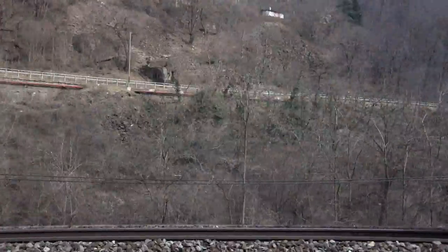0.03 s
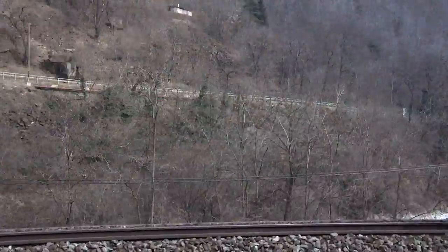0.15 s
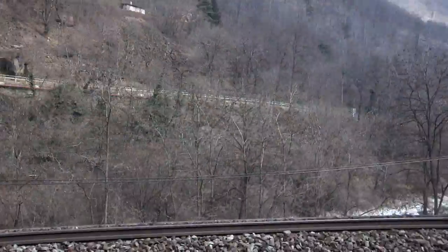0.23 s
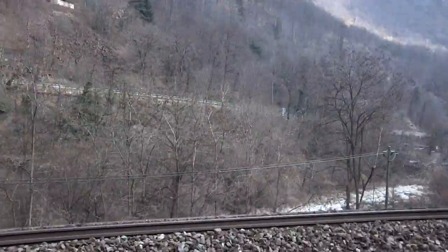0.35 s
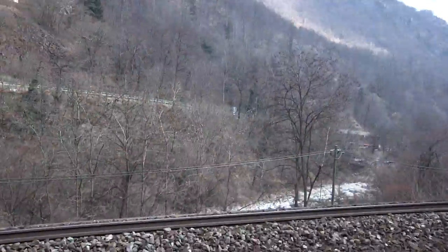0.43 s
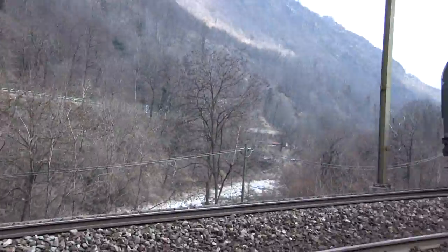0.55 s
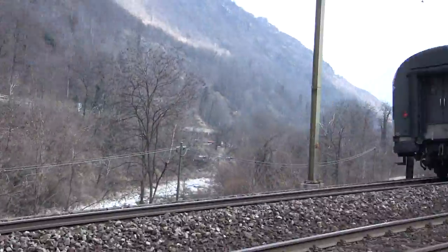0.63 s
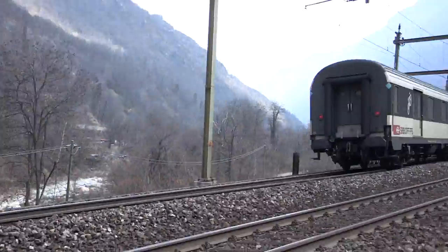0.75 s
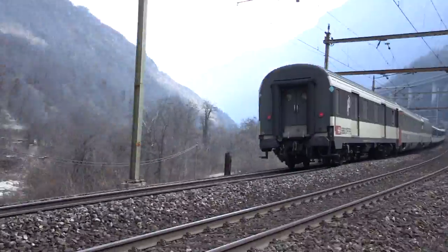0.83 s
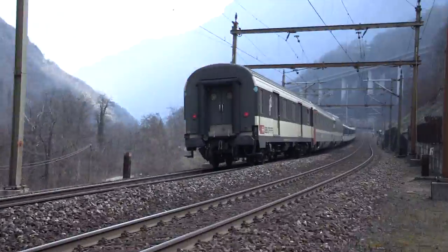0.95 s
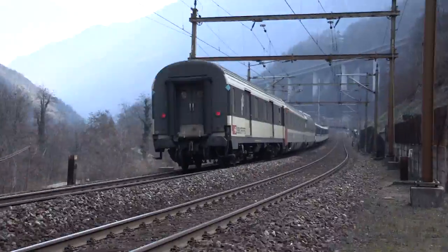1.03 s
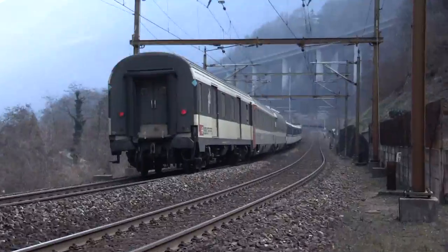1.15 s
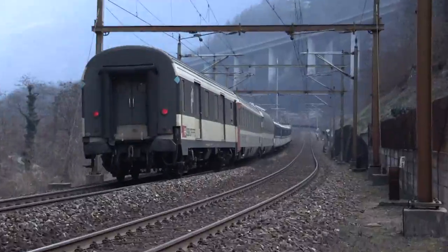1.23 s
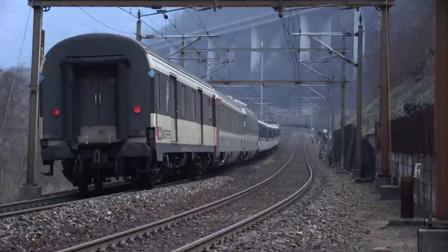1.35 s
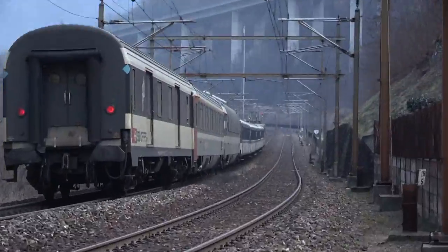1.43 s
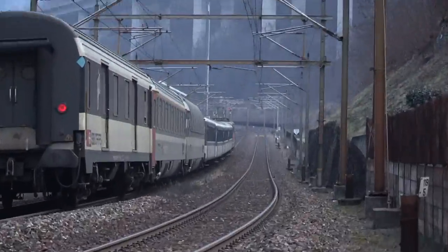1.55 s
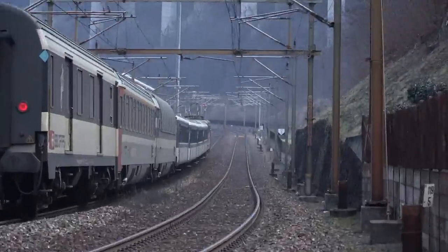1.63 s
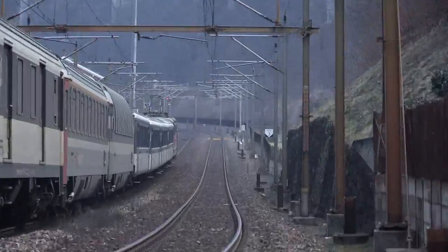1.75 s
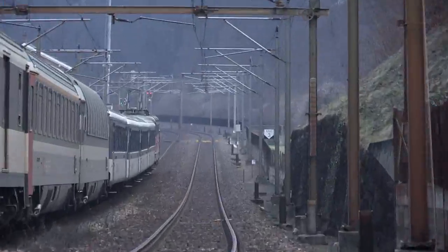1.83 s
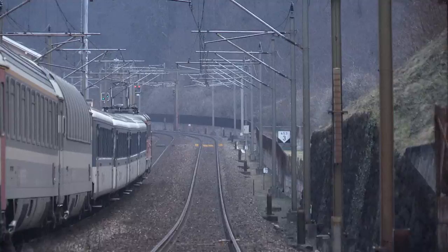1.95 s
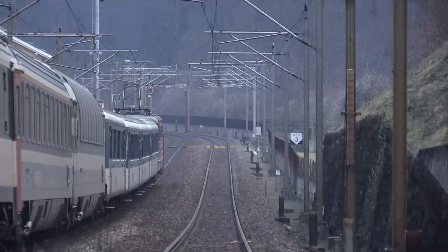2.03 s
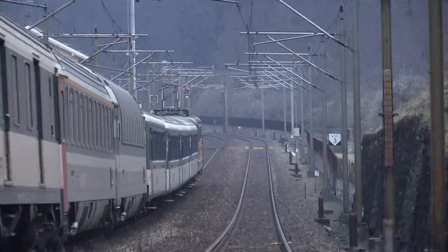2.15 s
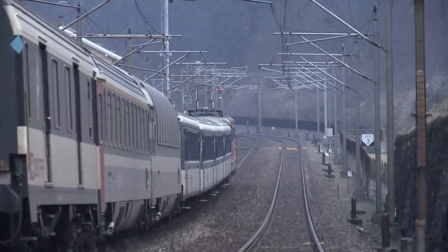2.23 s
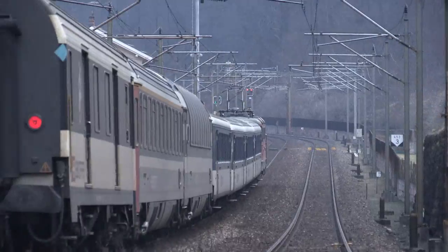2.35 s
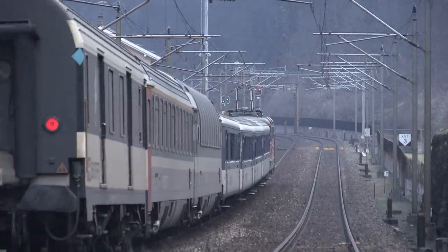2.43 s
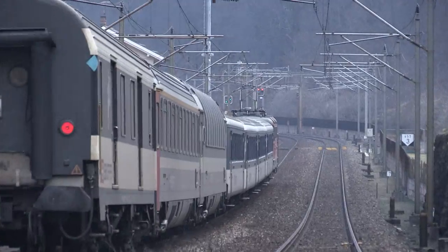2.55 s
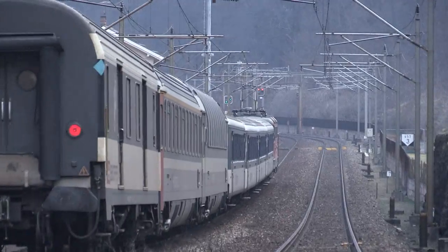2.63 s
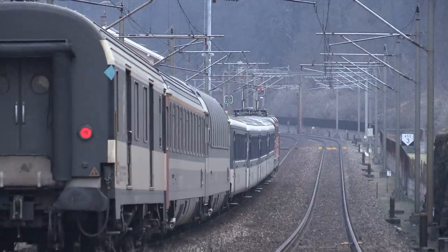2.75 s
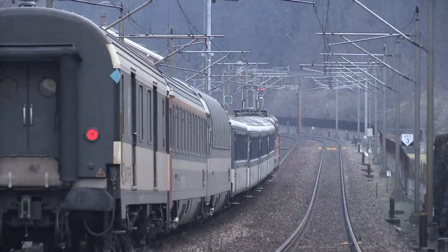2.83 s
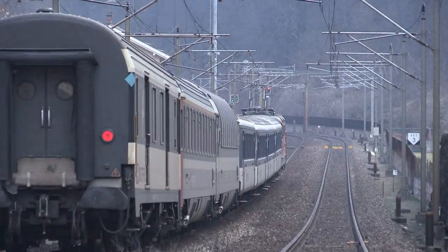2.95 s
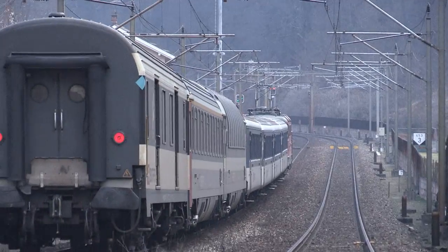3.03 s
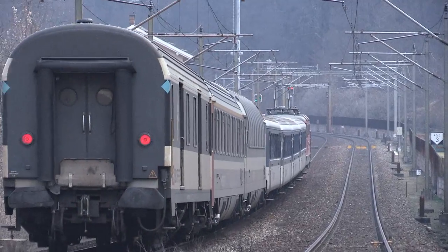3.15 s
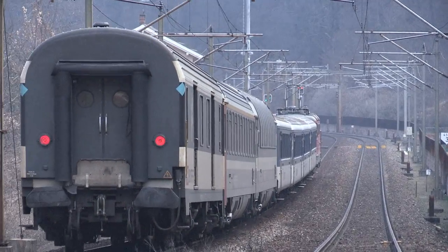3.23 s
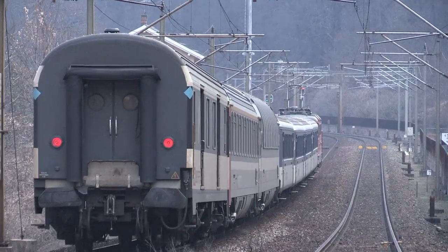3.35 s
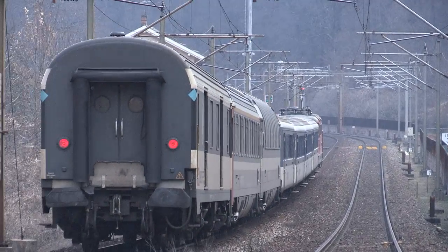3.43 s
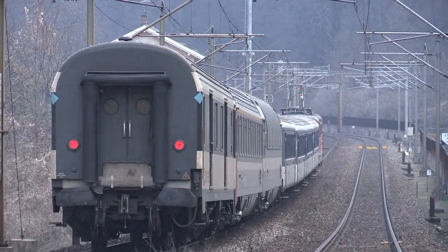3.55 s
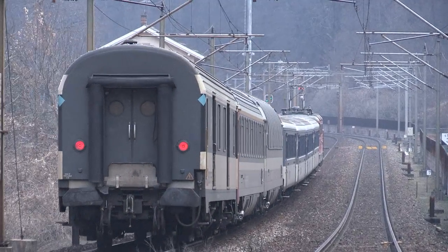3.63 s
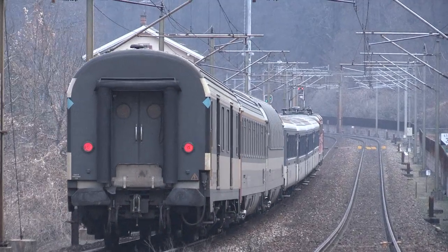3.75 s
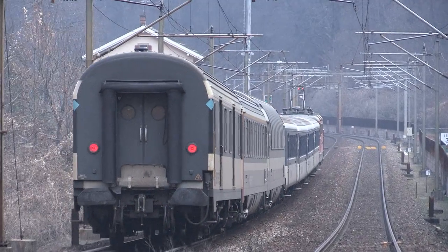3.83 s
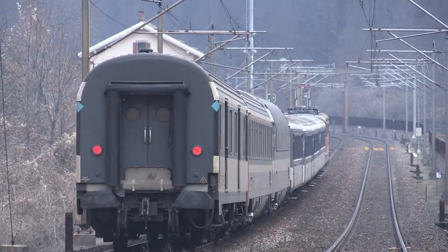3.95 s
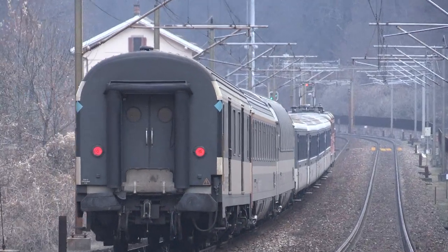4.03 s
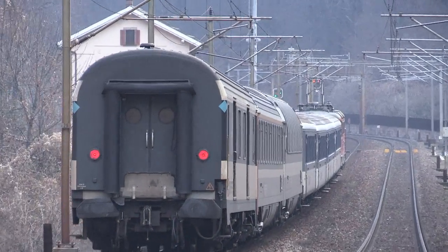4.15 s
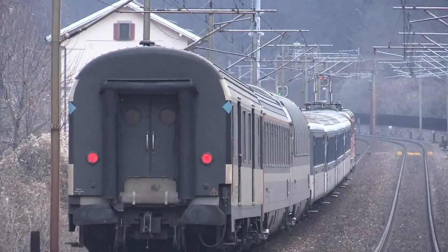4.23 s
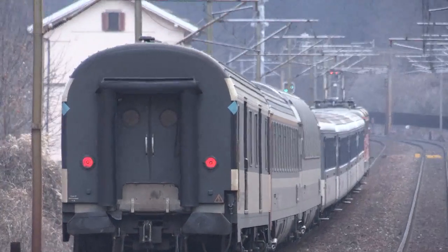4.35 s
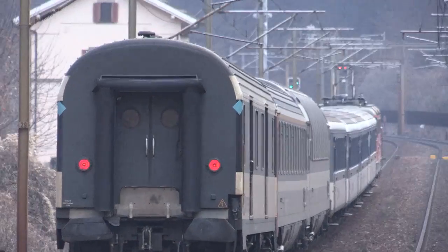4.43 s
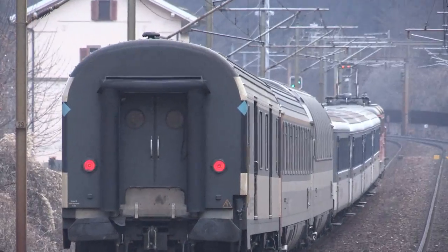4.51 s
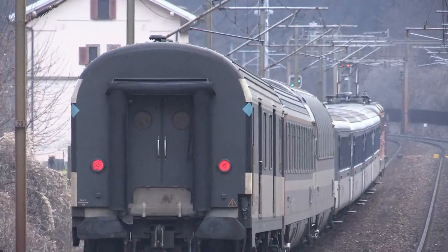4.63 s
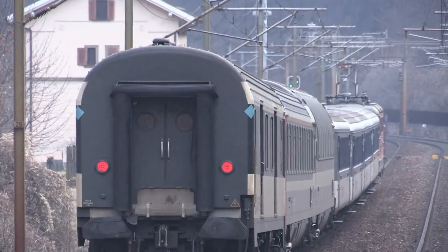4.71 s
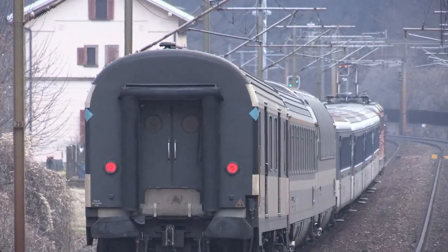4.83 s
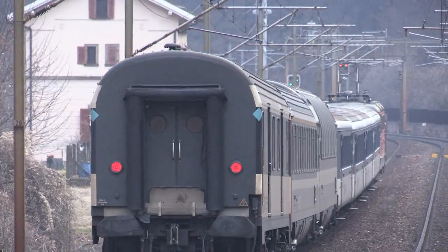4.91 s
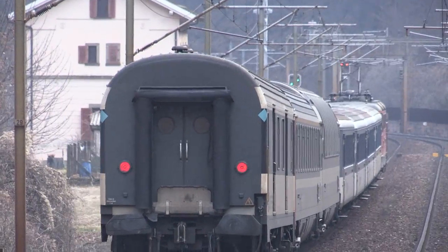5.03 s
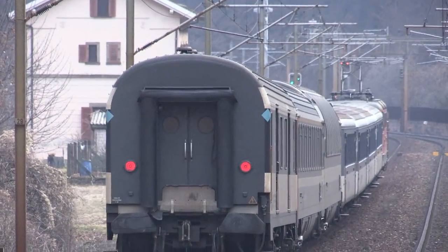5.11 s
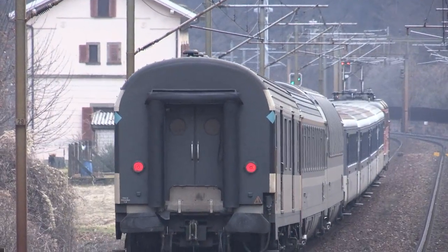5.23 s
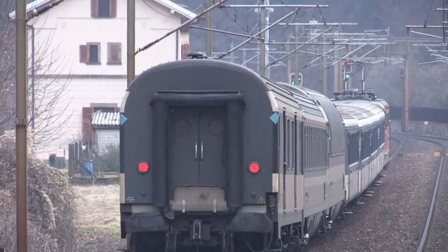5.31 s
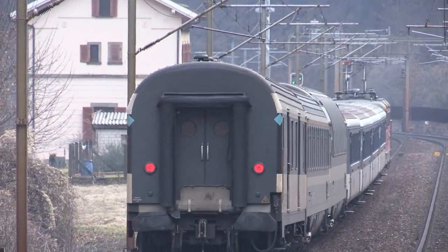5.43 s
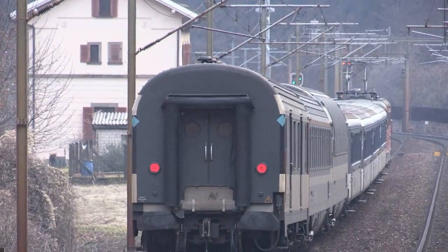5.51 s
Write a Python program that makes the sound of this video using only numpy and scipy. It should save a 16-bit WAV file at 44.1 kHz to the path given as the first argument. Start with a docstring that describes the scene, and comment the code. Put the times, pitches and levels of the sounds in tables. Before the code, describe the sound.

A stereo microphone near the track catches the tail of a train: uneven wheel knocks over a dense rolling roar, loudest at the start and falling quickly. As the train goes round the bend, the faint distant roar remains beneath short, wavering wheel squeals and rough flange grinding. Late on, low wind noise brushes the microphone, then a small scratchy click sounds close by.

```python
"""A knocking, rolling roar fades as the last coach of an electric train runs away round a curve.
The bend hides its last bogie (the wheel frame), leaving the far train: shaped noise with rings in the track.
Flanges (wheel rims) bear on the outer rail in fits: narrow noise grinds and rings, wavering tones squeal.
Late on, a lumpy noise gust rushes over the microphones and a small double click sounds close by.
Under it all lie a low outdoor rumble and a thin hiss that rises at the end."""
import sys
import numpy as np
from scipy import signal
from scipy.fft import rfft, irfft, next_fast_len
from scipy.io import wavfile
from scipy.ndimage import uniform_filter1d, minimum_filter1d, map_coordinates

SR = 44100
rng = np.random.default_rng(int(sys.argv[2]) if len(sys.argv) > 2 else 0)


def transcribe(signal):
    """Save signal, clipped to [-1, 1], as a 16-bit WAV file at the path in sys.argv[1]."""
    frames = np.atleast_2d(signal).T
    limited = np.clip(frames, -1, 1)
    pcm = np.round(limited * 32767).astype(np.int16)
    wavfile.write(sys.argv[1], SR, pcm)


N = 246078

# worn treads (the rolling faces of the wheels) knock on the rail: (time [s], strength [dB])
KNOCKS = [(.032, 1), (.075, 1), (.125, 7), (.16, 0), (.214, 6.5), (.297, 6), (.351, 4), (.419, 5.5),
          (.447, 2.5), (0.477, 4.5), (.528, 3), (0.569, 5.5), (.67, 3), (0.704, 6.5), (.735, 1.5),
          (.80, 1.5), (.849, 2), (0.908, 4), (.96, 2), (1.016, 3.5), (1.13, 1.5), (1.249, 3.5),
          (1.294, 4.5), (1.377, 1.5), (1.427, 1), (1.518, 2), (1.835, 0.5), (2.11, 0), (2.255, 4)]
# rolling roar of the last bogie: (level abreast [dB], loss per tenfold distance [dB])
ROAR_FADE = (-12.5, 39.06)


def amp(db):
    """Turn decibels into gain."""
    return 10 ** (np.asarray(db) / 20)


def unit(x):
    """Scale to an average (rms) level of 1."""
    return x / np.sqrt(np.mean(x ** 2) + 1e-20)


def along(points, hz):
    """Read a curve of (frequency [Hz], value) points on a log frequency axis."""
    f, v = np.transpose(points)
    return np.interp(np.log(hz + 1), np.log(f + 1), v)


def curves(rows):
    """Give one value per sample for each column after the time."""
    s, *cols = np.transpose(rows)
    t = np.arange(N) / SR
    return [np.interp(t, s, c) for c in cols]


def wobble(rate):
    """Draw a smooth random curve with this many random knots a second."""
    coarse = np.arange(0, N + 16, 16)
    knots = rng.standard_normal(int(N * rate / SR) + 4)
    bends = map_coordinates(knots, [coarse * rate / SR])
    return np.interp(np.arange(N), coarse, bends)


def filtered(x, response):
    """Multiply the spectrum of x by a response that depends on frequency."""
    m = next_fast_len(N + 8192)
    hz = np.fft.rfftfreq(m, 1 / SR)
    return irfft(rfft(x, m) * response(hz), m)[..., :N]


def rush(spectrum, alike, patchy_db):
    """Make stereo noise of rms 1 with patches of random gain; alike is the left-right likeness."""
    z = signal.stft(rng.standard_normal((2, N)), nperseg=1024)[2]
    field = uniform_filter1d(rng.standard_normal(z.shape[1:]), size=3, axis=0)
    field = uniform_filter1d(field, size=10, axis=1)
    pair = signal.istft(z * amp(patchy_db * unit(field)), nperseg=1024)[1][:, :N]

    def response(hz):
        turn = np.arccos(np.clip(along(alike, hz), -1, 1)) / 2
        return amp(along(spectrum, hz)) * [np.cos(turn), np.sin(turn)]

    mid, side = filtered(pair, response)
    return unit(np.array([mid + side, mid - side]))


def ringing(hz, width_hz, spread):
    """Rub a resonance at random: stereo narrow noise round a fixed or moving pitch."""
    coarse = np.arange(0, N + 16, 16)
    damping = signal.butter(2, width_hz / 2, fs=SR / coarse[1], output="sos")
    swing = signal.sosfilt(damping, rng.standard_normal((2, 2, len(coarse))))
    phase = 2 * np.pi * np.cumsum(hz * np.ones(N)) / SR
    cos, sin, n = np.cos(phase), np.sin(phase), np.arange(N)
    mid, side = [np.interp(n, coarse, a) * cos + np.interp(n, coarse, b) * sin for a, b in swing]
    return unit(np.array([mid + spread * side, mid - spread * side]))


def placed(x, lean_db):
    """Pan the treble with the train; bass bends round the listening point and stays a little left."""
    # where the train is heard: (time [s], left-right level difference before the lean [dB])
    bearing = [(0, -6.5), (.4, -6.5), (1.1, -1), (1.8, -0.6), (3, -0.6), (5.58, -1)]
    pan = lambda db: amp(np.array([db, -db]) / 2)
    # (frequency [Hz], share that bends round)
    bass = filtered(x, lambda hz: np.clip(along([(230, 1), (1200, 0.033)], hz), 0, 1))
    return bass * pan(np.full(N, 2.7)) + (x - bass) * pan(curves(bearing)[0] + lean_db)


def distance():
    """Follow the last bogie from abreast, straight along the track, in multiples of the track's distance."""
    speed_m_per_s, track_m = 21.05, 13.97
    return np.hypot(1, speed_m_per_s * np.arange(N) / SR / track_m)


def receding(fade):
    """Give the gain of a sound that weakens as the last bogie gets farther away."""
    abreast_db, loss_db = fade
    return amp(abreast_db - loss_db * np.log10(distance()))


def behind_bend():
    """Tell how far the bend hides the last bogie, from 0 to 1."""
    hide_s, hide_takes_s = 2.71, 0.41
    return np.clip((np.arange(N) / SR - hide_s) / hide_takes_s, 0, 1)


def widened(x):
    """Widen the stereo image close by, where the train fills a wide angle; narrow it as the train leaves."""
    close_width = 1  # extra side gain abreast
    side = (x - x[::-1]) / 2
    return x + close_width / distance() ** 2 * side


def track_changes():
    """Raise or lower the thrum and the roar, in dB, for a moment as the track changes under the wheels."""
    # (time at the middle [s], thrum change [dB], roar change [dB])
    track_spots = [(0.03, 8, 1.5), (0.33, 6, 1), (0.55, -1, 1.4), (0.71, 4, 2), (1.55, 1, 0.3),
                   (2.04, 0, 1.5), (2.65, -2, -0.7)]
    spot_s = 0.1
    t = np.arange(N) / SR
    return sum(np.outer(changes, np.exp(-((t - s) / spot_s) ** 2)) for s, *changes in track_spots)


def judder(depth_db, rattle_db):
    """Oval treads throb twice a wheel turn, bogies rattle at random, and knocks bunch the roar into bursts."""
    throb_hz, knock_s = 14, 0.012  # the throb rate wanders round this
    t = np.arange(N) / SR
    phase = 2 * np.pi * np.cumsum(throb_hz * (1 + 0.12 * wobble(5.36))) / SR
    knock = amp(sum(db * np.exp(-((t - s) / knock_s) ** 2) for s, db in KNOCKS))
    # divide by the local average, so that knocks gather the sound instead of adding to it
    burst = knock / np.sqrt(uniform_filter1d(knock ** 2, size=SR // 4))
    return burst * amp(depth_db * np.sin(phase) + rattle_db * wobble(90))


def rolling(flange_hiss):
    """Rough wheels shake sleepers and rails; with distance the track's own resonances drop away."""
    # noise colours of the low thrum, roar, hiss and high fizz: (frequency [Hz], relative level [dB per Hz])
    thrum_spectrum, fizz_spectrum = [(25, -44), (45, -52), (100, -18.5), (150, -11), (192, 1.5), (240, -7),
                                     (300, -10), (450, -45), (900, -90)], [(1000, -70), (4000, -5), (7000, 3), (8300, 0.5),
                                                    (9600, 3.5), (11000, -1.5), (13500, -4), (15000, 2)]
    roar_near, roar_far = [(60, -90), (180, -46), (300, -26.5), (355, -2.5), (400, -5), (445, 0.5),
                           (500, 1), (620, -8), (800, -5), (880, -5), (960, -4), (1150, -16.5), (1600, -38),
                           (2100, -46), (6000, -62)], [(30, -60), (150, -19.5), (310, -7), (470, -9), (600, -3.5),
                                              (770, 2), (950, -3), (1150, -4), (1600, -5.5), (2100, -11),
                                              (6000, -54.5)]
    hiss_near, hiss_far = [(200, -70), (900, -57), (1500, -4), (1900, 0), (2500, 1.5), (2780, -4),
                           (3400, -6), (4300, -11.5), (5100, -9), (6000, -17.5), (7500, -26.5),
                           (12000, -45)], [(200, -70), (900, -16), (1600, 0), (2200, -7.5), (2600, 1.5),
                                              (3100, 2), (3800, -4), (4400, -6.5), (5100, -9.5),
                                              (6000, -17.5), (7000, -22.5), (8200, -34), (10000, -39)]
    # stereo likeness of the roar: (frequency [Hz], left-right likeness [-1 to 1])
    roar_alike = [(60, 1), (300, 0.99), (550, 0.93), (900, 0.86), (1400, 0.72), (3000, 0.69)]
    # roar from the rest of the train: (time [s], level before the common gain [dB])
    distant_roar = [(3.2, -45.5), (3.5, -47.5), (4.11, -43.5), (4.5, -46.5), (5.39, -43.5), (5.58, -45)]
    distant_gain_db = 2.5
    # (level abreast [dB], loss per tenfold distance [dB])
    thrum_fade, hiss_fade, fizz_fade = (-34, 25.2), (-31, 26.1), (-39, 61)
    hide_thrum_db, hide_roar_db, hide_hiss_db = 12, 10.5, 3  # losses behind the bend
    diffuse_share = 0.2  # share of far-sounding noise even close by
    hiss_share = 0.55  # share of the roar's track changes and judder that reaches the hiss

    hidden = behind_bend()
    thrum_change_db, roar_change_db = track_changes()
    near_gain = receding(ROAR_FADE) * amp(roar_change_db - hide_roar_db * hidden)
    distant_gain = amp(curves(distant_roar)[0] + distant_gain_db)
    roar_gain = np.hypot(near_gain, distant_gain)
    wheel_hiss = receding(hiss_fade) * amp(hiss_share * roar_change_db - hide_hiss_db * hidden)
    hiss_gain = np.hypot(wheel_hiss, flange_hiss)

    far = np.clip(diffuse_share + 0.8 * (distant_gain / roar_gain) ** 2, 0, 1)
    blend = lambda near, distant: np.sqrt(1 - far) * near + np.sqrt(far) * distant
    shake = judder(depth_db=0.5, rattle_db=-0.16)

    thrum_gain = receding(thrum_fade) * amp(thrum_change_db - hide_thrum_db * hidden)
    thrum = thrum_gain * rush(thrum_spectrum, [(60, 1.0), (200, 0.96)], patchy_db=1)
    close_roar = shake * rush(roar_near, roar_alike, patchy_db=1.5)
    roar = roar_gain * blend(close_roar, rush(roar_far, roar_alike, patchy_db=2))

    near_alike = [(1400, 0.91), (2400, 0.94), (4200, 0.62), (7000, 1.0)]
    close_hiss = amp(1.0) * shake ** hiss_share * rush(hiss_near, near_alike, patchy_db=2.0)
    far_hiss = amp(3.5) * rush(hiss_far, [(1000, 1.0), (4000, 0.88)], patchy_db=1.5)
    hiss = hiss_gain * blend(close_hiss, far_hiss)
    fizz = receding(fizz_fade) * rush(fizz_spectrum, [(7000, 0.78), (14000, 0.36)], patchy_db=3.5)

    # the rail bounces on its pads
    bounce_gain = amp(-5.5) * roar_gain * (1 - far) ** 2 / distance()
    bounce = bounce_gain * ringing(444, width_hz=15.0, spread=.1)
    # the rail flexes between sleepers: (time [s], level relative to the roar [dB])
    span_db, = curves([(0, -39), (.9, -5), (1.4, -7.5), (1.9, -7.5), (2.7, -17), (3, -28)])
    flex = 0.75 * ringing(1055, width_hz=310, spread=0.71)
    flex += 0.49 * ringing(958, width_hz=29, spread=0.3)
    flex += 0.36 * ringing(1055, width_hz=32, spread=0.3)
    span = amp(span_db) * roar_gain * flex
    # the sleepers bend
    sleepers = amp(span_db - 6.5) * near_gain * ringing(760, width_hz=220, spread=0.28)

    main = thrum + roar + shake * (bounce + sleepers) + widened(hiss) + fizz
    return placed(main, lean_db=1.85) + placed(shake * span, lean_db=10.5)


def thumps():
    """Each tread knock rings the track for a moment, a little differently every time."""
    # ringing of rail and sleepers: (centre frequency [Hz], middle level [dB], time to fall 60 dB [s])
    track_modes = [(364, -1.5, 0.082), (453, 4.5, 0.07), (509, 3, 0.03), (686, -6, 0.025),
                   (794, -7.5, 0.037), (955, -2, 0.044), (1050, -12, 0.036), (1500, 0, 0.02)]
    thump_db, attack_s, low_cut_hz = -7, 0.00303, 270
    t, out = np.arange(SR // 8) / SR, np.zeros(N + SR)
    hz, mode_db, t60 = np.transpose(track_modes)[:, :, None]
    for s, db in KNOCKS:
        detune, scatter, turn = rng.standard_normal((3, len(hz), 1))
        tone = np.sin(2 * np.pi * (hz * (1 + 0.016 * detune) * t + turn))
        ring = amp(mode_db + 2.7 * scatter - 60 * t / t60) * tone
        start = max(round((s - 2 * attack_s) * SR), 0)
        out[start:start + len(t)] += amp(db + thump_db) * (1 - np.exp(-t / attack_s)) * ring.sum(axis=0)
    # a slim rail radiates little bass
    radiated = filtered(out[:N], lambda hz: 1 - 1 / (1 + (hz / low_cut_hz) ** 4))
    return placed(receding(ROAR_FADE) * radiated, lean_db=-1.0)


def rail_whine():
    """The rail sings thinly while the wheels are still near."""
    # rail resonances: (frequency [Hz], width [Hz], relative level [dB])
    rail_modes = [(2406, 64, -1), (2930, 60, -9)]
    rail_fade = (-34.5, 57)  # (level abreast [dB], loss per tenfold distance [dB])
    whine = sum(amp(db) * ringing(hz, width, spread=0.25) for hz, width, db in rail_modes)
    return placed(receding(rail_fade) * whine, lean_db=4.0)


def bogie_ring():
    """The last bogie rings thinly, as narrow noise, until the bend hides it."""
    bogie_hz, bogie_fade = 1812, (-34, 37)  # fade: (level abreast [dB], loss per tenfold distance [dB])
    ring = ringing(bogie_hz, width_hz=32, spread=0.25)
    return placed(receding(bogie_fade) * (1 - behind_bend()) * ring, lean_db=2.0)


def bites():
    """Give gains of grinding, ringing and hiss: each flange contact builds up, holds and lets go."""
    # flange contacts: (start [s], length [s], grinding [dB], ringing [dB], hiss [dB])
    contacts = [(0.84, 0.55, -37.5, -70, -45), (1.507, 0.52, -45, -50.5, -55),
                (2.47, 0.16, -62, -51.5, -67), (3.08, 0.42, -53.5, -58, -53),
                (3.59, 0.32, -49.5, -54.5, -53), (3.883, 0.29, -43.5, -52.5, -50),
                (4.163, 0.23, -47, -52, -55.5), (4.485, 0.24, -41, -51, -58.5),
                (4.81, 0.3, -44.5, -51.5, -58), (5.31, 0.11, -66, -57, -75)]
    attack_s, release_s = 0.037, 0.21
    t, power = np.arange(N) / SR, np.zeros((3, N))
    for s, length, *levels in contacts:
        attack = np.clip((t - s) / attack_s, 0, 1)
        release = np.exp(-np.clip((t - s - length) / release_s, 0, 20))
        power += np.outer(amp(levels), attack * release) ** 2
    return np.sqrt(power)


def wheels(flange_grind, flange_ring):
    """Sideways creep in the curve rings each wheel mode in fits, while the flange grinds in pulses."""
    # wheel resonances: (centre frequency [Hz], width [Hz], level before air loss [dB])
    wheel_modes = [(1785, 26, -6), (2353, 20.6, -3), (2397, 26, -1.5), (2396, 170, -2.5), (2444, 25, -2.5),
                   (2556, 160, -4.5), (2820, 18, -9), (2850, 17, -12.5), (2920, 23, -8.5),
                   (3120, 27, -14.5), (3392, 29, -11), (3445, 30, -13.5), (3750, 24, -14), (3900, 54, -16),
                   (3960, 24, -16), (4060, 20, -18), (4460, 22, -21), (4620, 22, -16.5), (4700, 20, -18.5),
                   (4878, 30, -17), (5310, 18, -18.5), (5390, 18, -19), (5830, 20, -36), (6040, 18, -26),
                   (6100, 14, -24.5), (6865, 18, -36), (6940, 18, -32)]
    # the grinding's pitch sinks deep in the curve and recovers as the flange lets go: (time [s], pitch [Hz])
    grind_pitch = [(3.0, 1400), (3.7, 1425), (4.0, 1385), (4.45, 1320), (4.65, 1270), (5.02, 1275),
                   (5.15, 1210), (5.3, 1380)]
    # narrow tones inside the grinding: (multiple of its pitch, relative level [dB])
    grind_tones = [(1.03, -6.5), (0.972, -6)]
    # steady part: (level abreast [dB], loss per tenfold distance [dB])
    ring_fade, grind_fade = (-40.5, 24.4), (-35.5, 23.3)
    air_loss_db, air_loss_at_hz = 0.8, 6000  # loss at this frequency per multiple of the track distance
    flutter_hz, flutter_db = 28.1, 1.7  # random pulses: knots per second and depth

    # air takes the top off the ringing, reckoned from the average distance
    beyond = distance() - distance().mean()
    modes = np.zeros((2, N))
    for hz, width, db in wheel_modes:
        air = amp(-air_loss_db * (hz / air_loss_at_hz) ** 2 * beyond)
        fit = unit(amp(2.6 * wobble(13)))
        pitch = hz * (1 + 0.000994 * wobble(9))
        modes += amp(db) * air * fit * ringing(pitch, width, spread=0.15)

    grind_hz, = curves(grind_pitch)
    tones = sum(amp(db) * ringing(ratio * grind_hz, width_hz=38, spread=0.2) for ratio, db in grind_tones)
    band = 0.64 * ringing(grind_hz, width_hz=250, spread=0.25)
    grind = (tones + band) * unit(amp(flutter_db * wobble(flutter_hz)))
    ring_gain = np.hypot(receding(ring_fade), flange_ring)
    grind_gain = np.hypot(receding(grind_fade), flange_grind)
    return placed(ring_gain * modes + grind_gain * grind, lean_db=2.0)


def background():
    """A low outdoor rumble, and a thin hiss that flickers, slowly sinks and rises at the end."""
    # noise colours of the hiss and of the valley's rumble: (frequency [Hz], relative level [dB per Hz])
    air_spectrum, valley_spectrum = [(5000, -14), (9000, -6), (11000, 2.5), (13500, 4), (14300, 4),
                                     (14900, -25)], [(20, -20), (50, -3), (100, -2), (200, -6.5), (600, -35),
                                                  (2000, -70)]
    air_db, sink_db_per_s = -65, 2
    rise_s, rise_takes_s, rise_db = 5.31, 0.15, 8.5
    t = np.arange(N) / SR
    level_db = air_db - sink_db_per_s * t + rise_db * np.clip((t - rise_s) / rise_takes_s, 0, 1)
    hiss = amp(level_db + 1.0 * wobble(14)) * rush(air_spectrum, [(10000, .3)], patchy_db=4.5)
    rumble = amp(-69.0) * rush(valley_spectrum, [(60, 0.97)], patchy_db=-2.5)
    return placed(hiss + rumble, lean_db=4.5)


def squeals():
    """Now and then stick-slip locks on one mode, which swells into a rough, wavering tone and lets go."""
    # squeals of single wheels: (middle [s], length [s], centre pitch [Hz], level before gain and scatter [dB])
    squeal_rows = [(2.40, .12, 4888, -51), (2.56, .14, 2347, -44), (2.67, .10, 3402, -55),
                   (2.90, .11, 4091, -50), (3.11, .14, 2890, -48), (3.15, .22, 5315, -57),
                   (3.28, .08, 6780, -67), (3.37, .12, 4080, -56), (3.412, .085, 6065, -57),
                   (3.65, .10, 2452, -49), (3.70, .09, 5318, -60), (3.795, .10, 2922, -43),
                   (3.99, .19, 2385, -43), (4.02, .11, 5404, -54.5), (4.03, .09, 3466, -50),
                   (4.05, .10, 4521, -53), (4.07, .09, 4866, -54.5), (4.10, .09, 2928, -45),
                   (4.12, .09, 5297, -58), (4.16, .10, 2845, -44.5), (4.17, .08, 3402, -49.5),
                   (4.18, .10, 2392, -43), (4.22, .10, 6180, -65), (4.31, .22, 2436, -42),
                   (4.40, .10, 6062, -56), (4.40, .09, 3143, -51), (4.43, .10, 5318, -57.5),
                   (4.53, .13, 2366, -36), (4.60, .12, 4888, -56), (4.62, .10, 2462, -44),
                   (4.65, .18, 2392, -39.5), (4.64, .09, 6180, -64), (4.68, .19, 6055, -59),
                   (4.72, .08, 2445, -44), (4.855, .09, 2380, -40), (4.96, .09, 2415, -45),
                   (4.97, .17, 4900, -58), (5.02, .09, 2490, -47), (5.08, .14, 2885, -51),
                   (5.12, .12, 2452, -42), (5.16, .16, 5404, -64), (5.43, .08, 2450, -45)]
    squeal_gain_db = -1
    t, out = np.arange(N) / SR, np.zeros((2, N))
    waver = .0027 * wobble(130)
    chatter = amp(1.8 * wobble(90))
    for s, length, hz, db in squeal_rows:
        on = np.abs(t - s) < length / 2
        swell = np.cos(np.pi * (t[on] - s) / length) * chatter[on]
        tone = np.sin(2 * np.pi * np.cumsum(hz * (1 + waver[on])) / SR)
        scatter_db = rng.normal(0, 1, (2, 1))  # each ear gets its own level
        out[:, on] += amp(db + squeal_gain_db + scatter_db) * swell * tone
    return placed(out, lean_db=2.5)


def flange_whine():
    """A thin, unsteady overtone of the flange grinding sinks to a steady note."""
    # (time [s], pitch [Hz], level [dB])
    whine_path = [(4.2, 4130, -75), (4.3, 4075, -55), (4.45, 3870, -63), (4.57, 3830, -53),
                  (4.75, 3770, -63), (5.05, 3760, -59.5), (5.28, 3746, -63), (5.4, 3746, -80)]
    hz, db = curves(whine_path)
    started = np.arange(N) / SR > whine_path[0][0]
    return placed(amp(db) * started * ringing(hz, width_hz=17, spread=0.2), lean_db=7)


def wind():
    """A soft, lumpy gust over the two microphone ports rises to its peak, holds, then drops."""
    # noise colour of the gust: (frequency [Hz], relative level [dB per Hz])
    wind_spectrum = [(20, -24), (60, -13), (100, -1), (190, 2), (300, 0), (450, -2), (700, -12),
                     (1500, -36), (5000, -63), (10000, -72)]
    peak_s, hold_s, gust_db = 4.755, 0.38, -39.5
    rise_db_per_s, drop_db_per_s = 58, 20.5
    t = np.arange(N) / SR - peak_s
    level_db = gust_db + rise_db_per_s * np.minimum(t, 0) - drop_db_per_s * np.maximum(t - hold_s, 0)
    lumps_db = 1.0 * wobble(14)
    gust = rush(wind_spectrum, [(60, 0.93), (400, 0.072)], patchy_db=0.0)
    return placed(amp(level_db + lumps_db) * gust, lean_db=5)


def chink(s, hz, db, t60):
    """A small, scratchy double click close by: something light catches and slips."""
    t = np.arange(N) / SR - s

    def strike(age, life):
        age = np.maximum(age, 0)
        return amp(-60 * age / life) * (1 - np.exp(-age / 0.0008))

    double = strike(t, t60) + 0.7 * strike(t - 0.006, t60)
    tone = np.sin(2 * np.pi * hz * t + 0.35 * wobble(420)) * double
    # (frequency [Hz], relative level [dB per Hz])
    colour = [(500, -8), (900, 5), (1800, 0), (3100, 2), (4000, -11), (5500, -13), (8000, -34)]
    scratch = strike(t + 0.002, 0.13) * rush(colour, [(2000, 0.7)], patchy_db=4.0)
    return amp(db) * (tone + 0.36 * scratch)


def scene():
    """Add up the train, the click, the wind and the outdoor background."""
    grind, ring, hiss = bites()
    track = rolling(hiss) + thumps() + rail_whine()
    train = track + bogie_ring() + wheels(grind, ring) + squeals() + flange_whine()
    return train + background() + wind() + chink(5.5435, hz=1665, db=-30, t60=0.037)


def record(dry):
    """Shift the phase between the two ports, hold down the highest peaks, then cut off the extreme treble."""
    # the left microphone port leads the right: (frequency [Hz], lead [radians])
    port_lead = [(30, 0.05), (190, 0.36), (350, 0.57), (900, 0.27), (1600, 0.46), (2700, 0.27), (4300, 0)]
    top_hz = 15200
    heard = filtered(dry, lambda hz: np.exp(0.5j * np.outer([1, -1], along(port_lead, hz))))
    needed = np.minimum(1, .95 / (np.abs(heard).max(axis=0) + 1e-9))
    gain = uniform_filter1d(minimum_filter1d(needed, size=600), size=600)
    return filtered(heard * gain, lambda hz: hz < top_hz)


dry = scene()
out = record(dry)
transcribe(out)
```